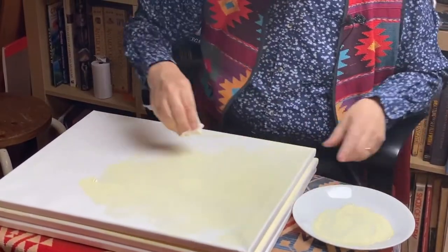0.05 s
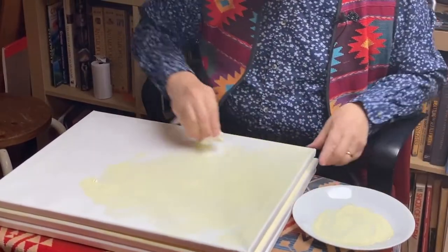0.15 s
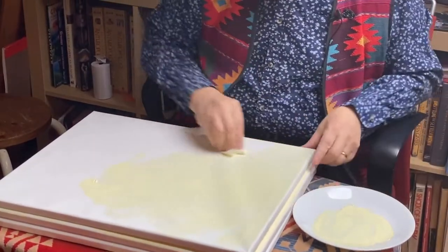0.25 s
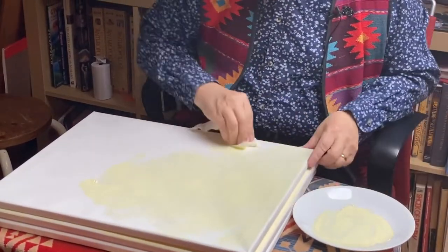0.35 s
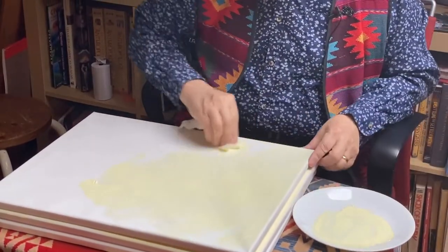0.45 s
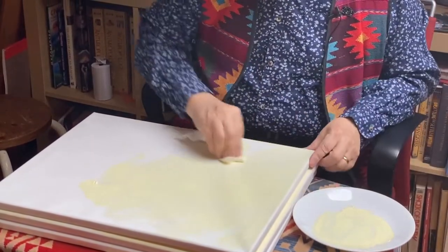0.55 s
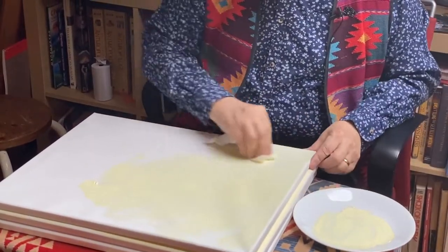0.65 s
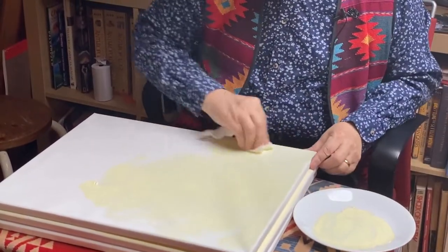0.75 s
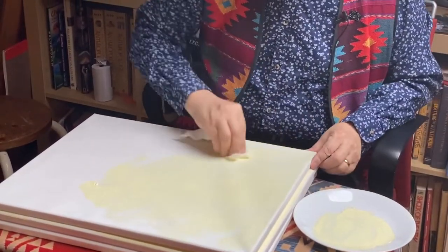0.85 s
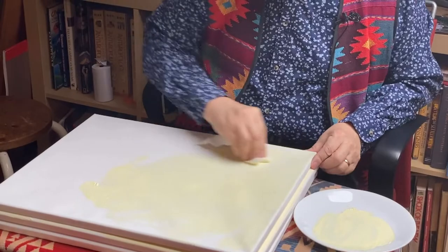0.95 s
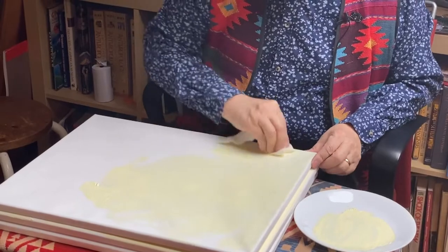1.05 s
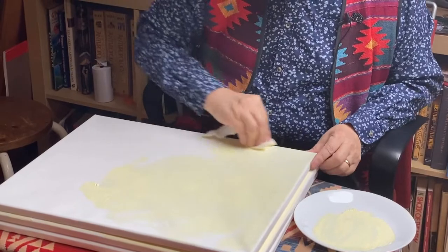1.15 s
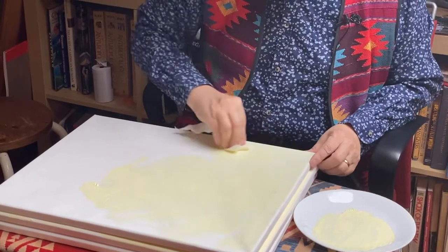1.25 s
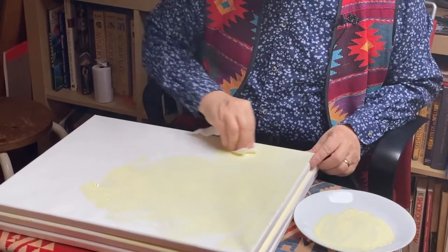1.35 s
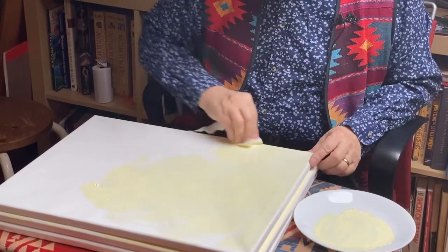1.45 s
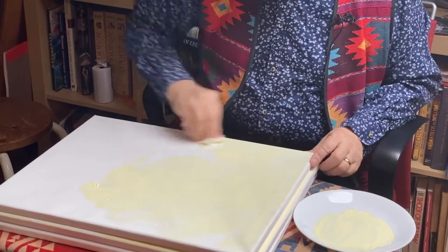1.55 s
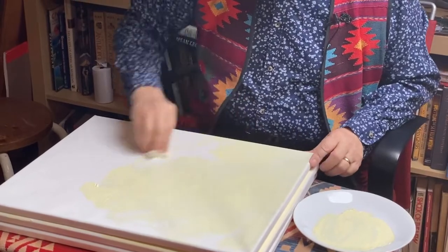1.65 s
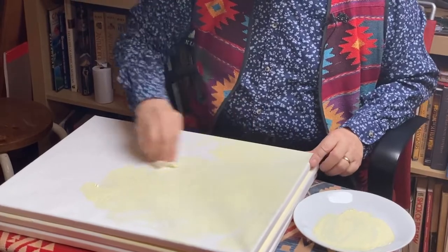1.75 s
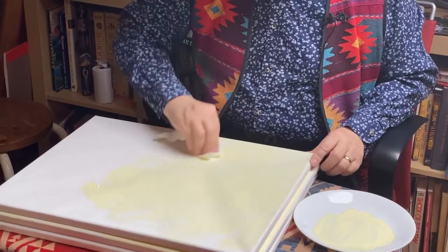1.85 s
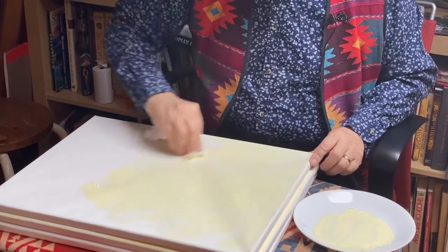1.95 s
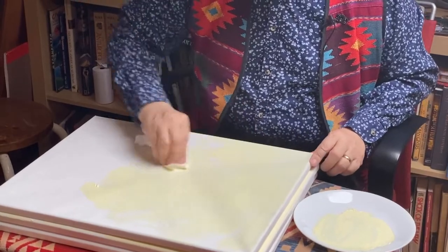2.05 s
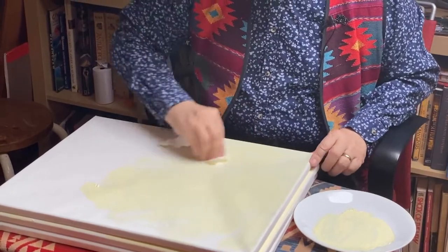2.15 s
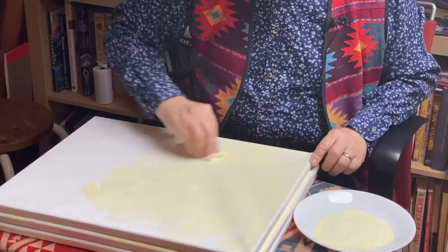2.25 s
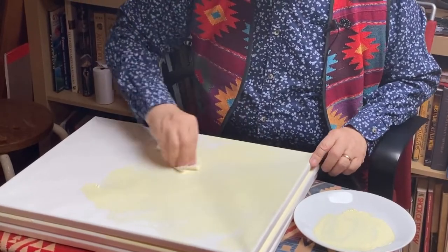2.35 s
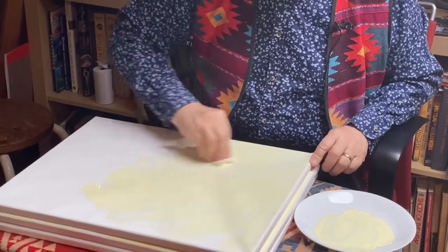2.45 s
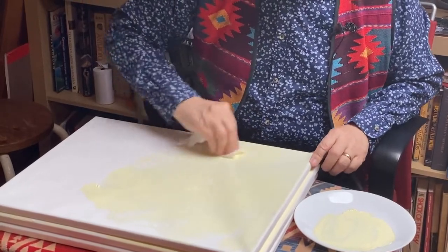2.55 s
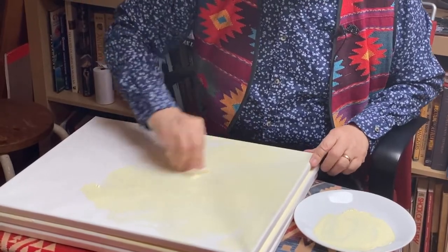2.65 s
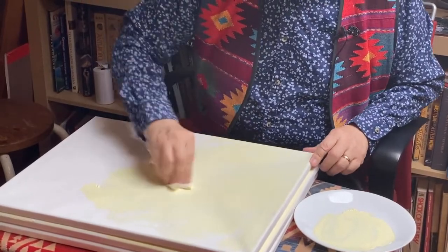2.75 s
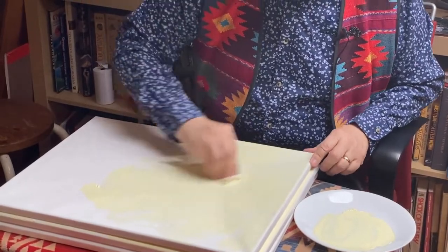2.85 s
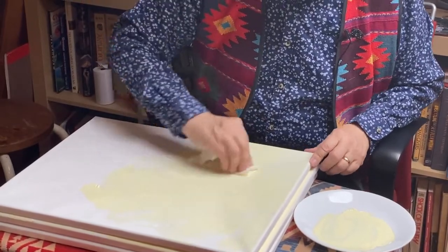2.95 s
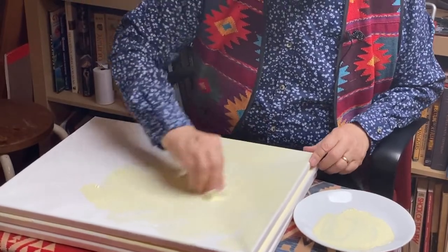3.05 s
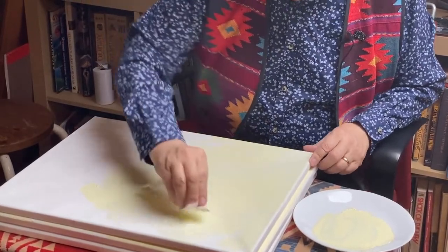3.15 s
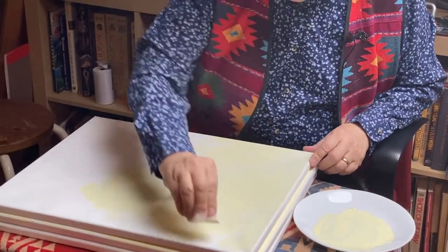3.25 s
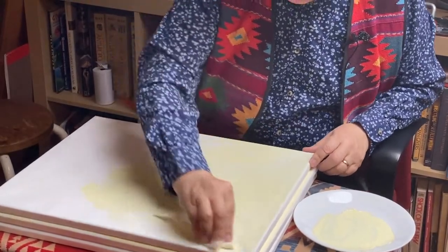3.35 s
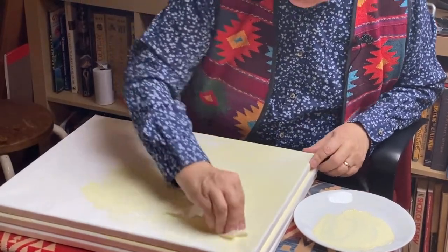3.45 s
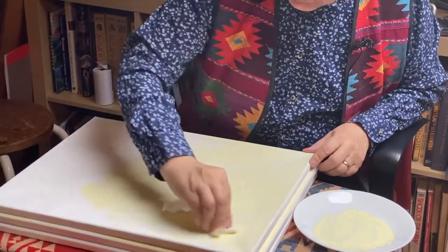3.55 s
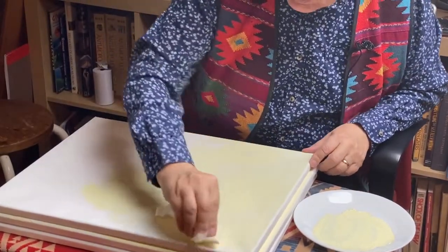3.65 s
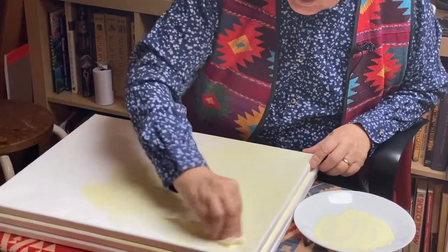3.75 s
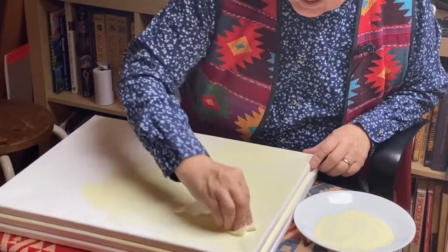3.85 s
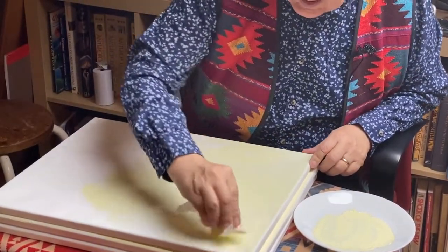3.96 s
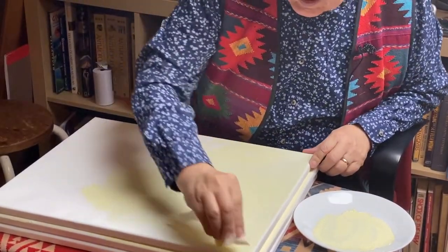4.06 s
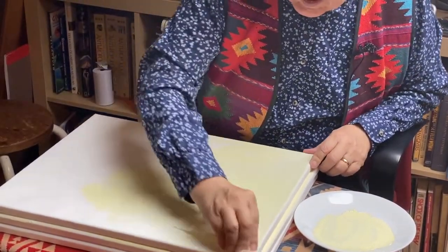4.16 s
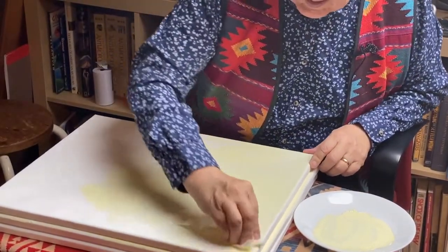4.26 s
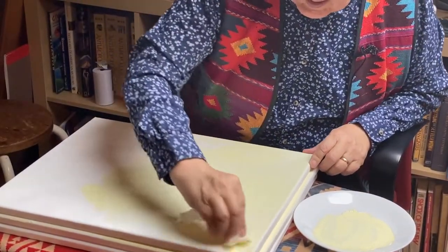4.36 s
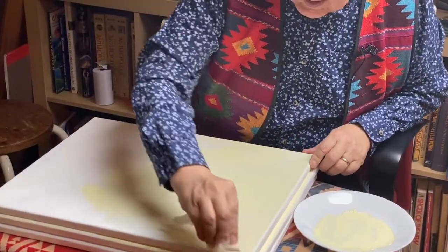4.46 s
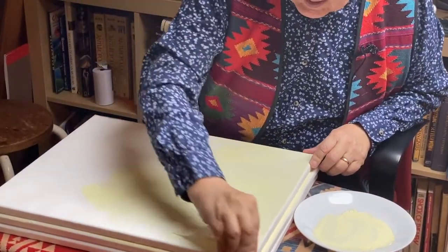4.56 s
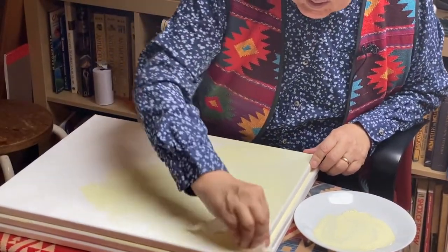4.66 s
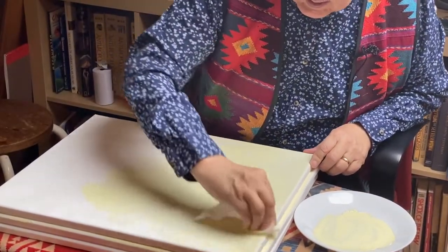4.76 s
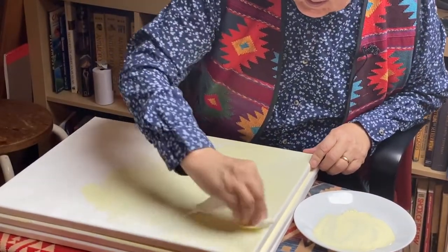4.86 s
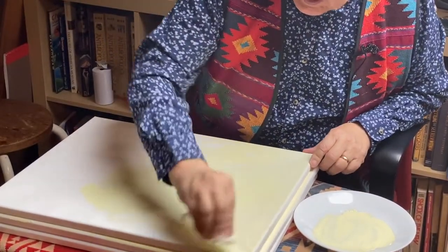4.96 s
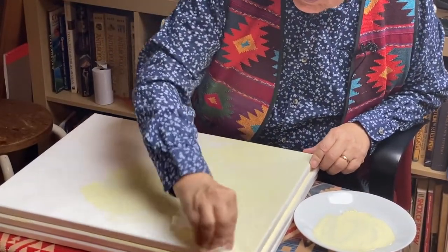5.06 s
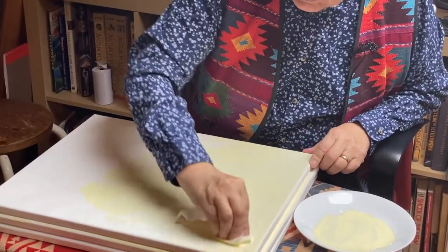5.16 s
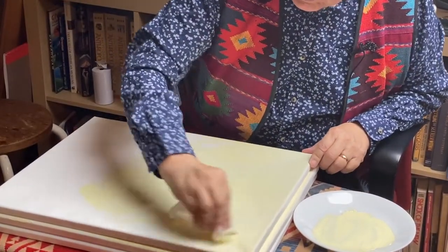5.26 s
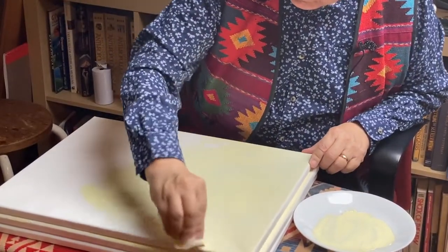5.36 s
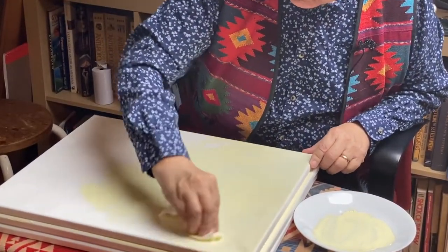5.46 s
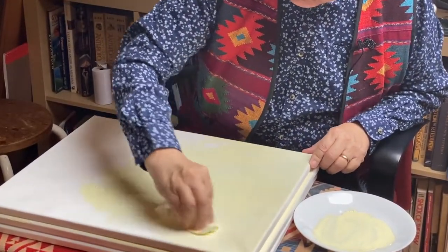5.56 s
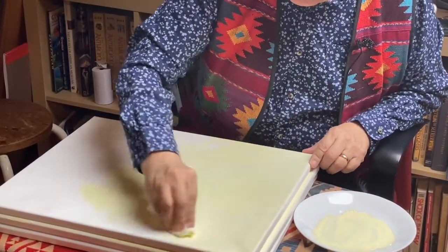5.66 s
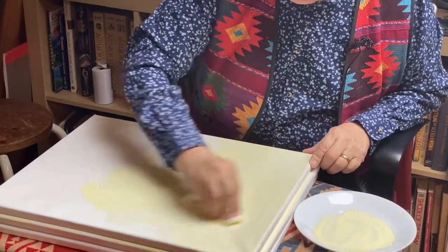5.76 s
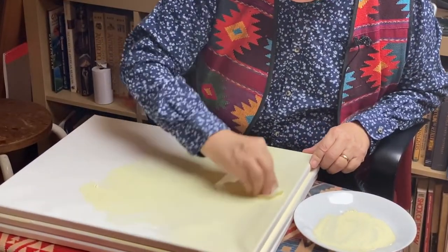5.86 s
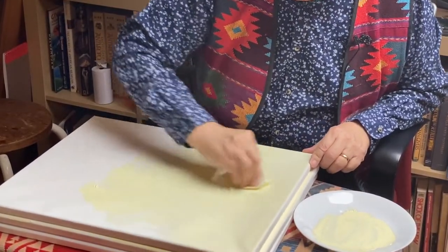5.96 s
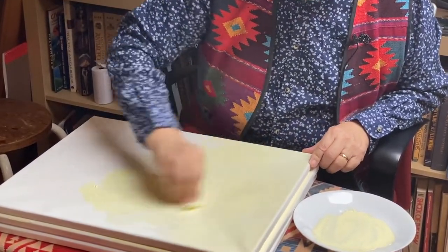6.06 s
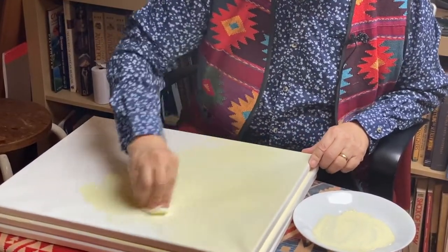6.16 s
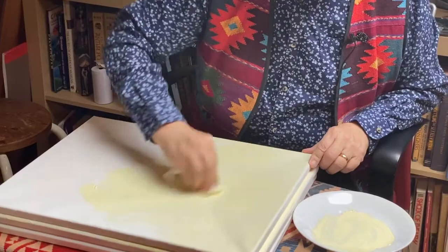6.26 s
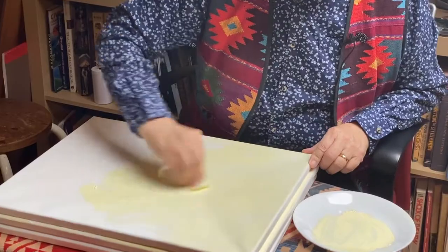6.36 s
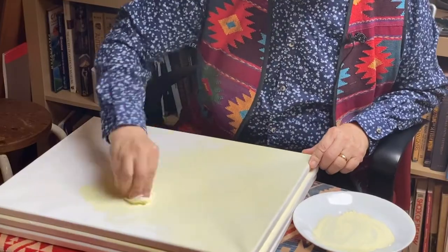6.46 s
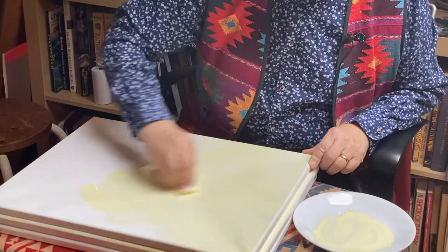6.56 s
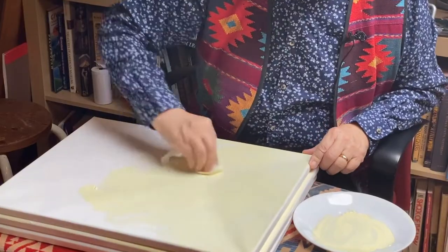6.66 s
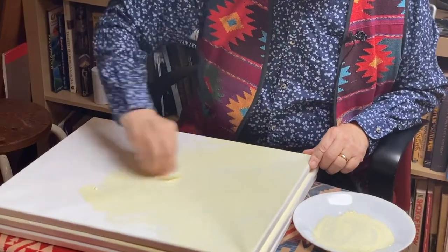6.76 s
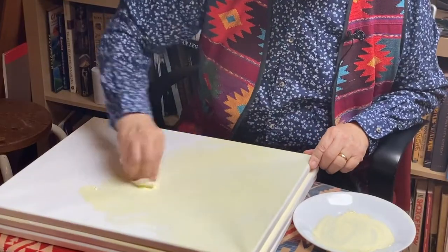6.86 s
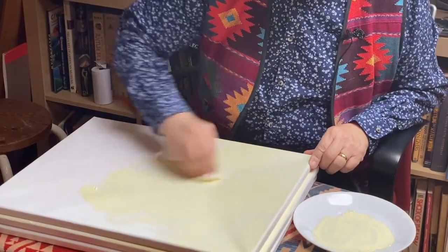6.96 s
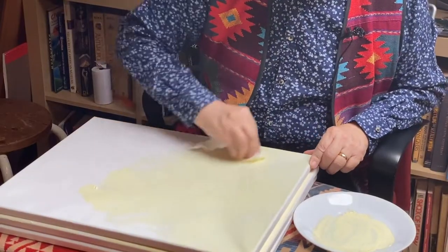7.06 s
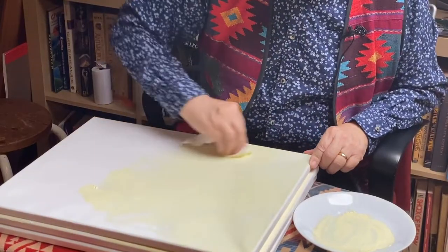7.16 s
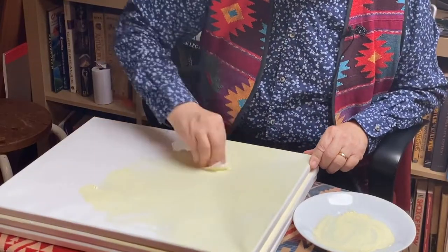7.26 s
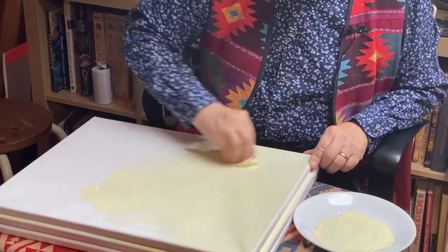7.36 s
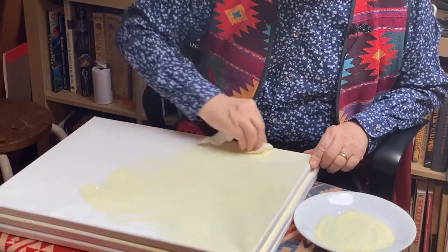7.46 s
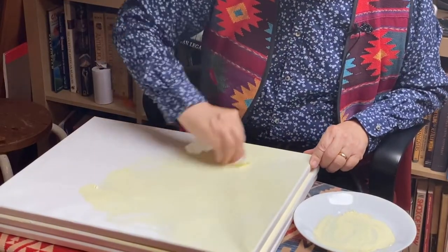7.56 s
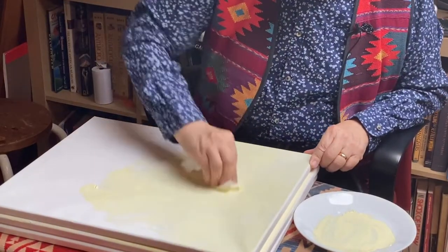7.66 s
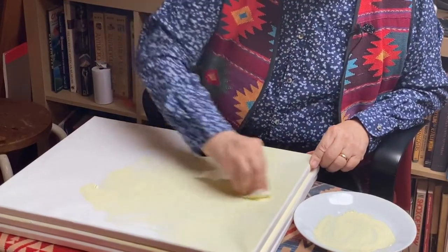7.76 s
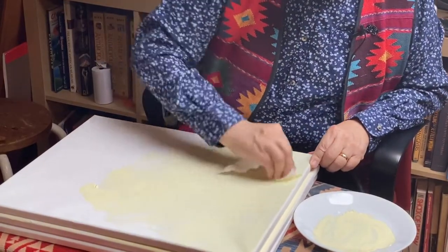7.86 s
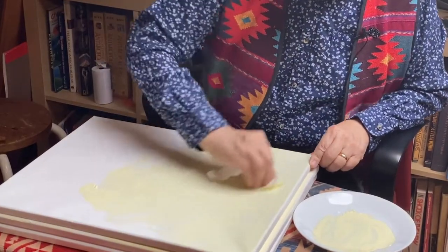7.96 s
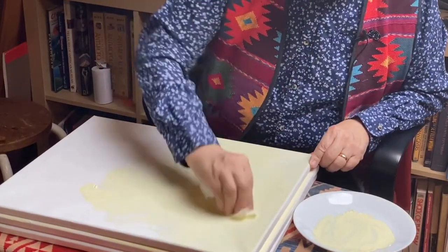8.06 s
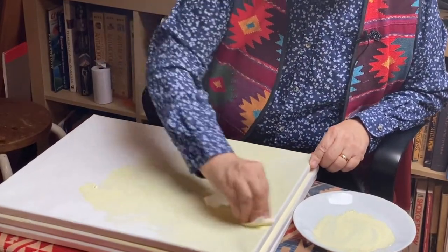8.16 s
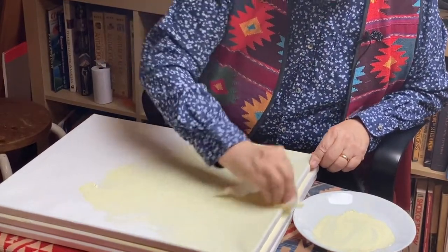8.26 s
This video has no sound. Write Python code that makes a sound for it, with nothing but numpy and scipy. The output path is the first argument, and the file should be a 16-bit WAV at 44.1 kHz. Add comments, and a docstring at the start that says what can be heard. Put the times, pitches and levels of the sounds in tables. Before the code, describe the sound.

Damp paper towel rubbed briskly back and forth on taut canvas, papery hissing swishes, with low hollow frame thuds and snaps from three seconds.

```python
"""A damp wad of paper towel is rubbed back and forth over a stretched canvas that lies on a stack of others.
Random fibre slips, coloured by filters and driven by the hand's speed, make hiss, fizz, scrape and drumming.
Snaps, rough scuffs and two brief drones come from the cloth; its frame thuds, rocks back and taps as damped
modes and noise bursts. It is heard close up in a small, quiet studio with a trembling table and a faint whine."""
import sys
import numpy as np
from scipy import signal
from scipy.fft import rfft, irfft, next_fast_len
from scipy.io import wavfile
from scipy.ndimage import uniform_filter1d, map_coordinates

SR = 44100
rng = np.random.default_rng(int(sys.argv[2]) if len(sys.argv) > 2 else 0)


def waveform_to_disk(signal):
    """Save audio, clipped to [-1, 1], as 16-bit WAV at the path in sys.argv[1]."""
    frames = np.transpose(np.atleast_2d(signal))
    scaled = np.clip(frames, -1, 1) * 32767
    samples = np.round(scaled).astype(np.int16)
    wavfile.write(sys.argv[1], SR, samples)


N = 366956  # length in samples, about 8.3 s


def amp(db):
    """Decibels to gain."""
    return 10 ** (np.asarray(db) / 20)


def unit(x):
    """x at rms 1."""
    return x / np.sqrt(np.mean(x ** 2) + 1e-20)


def noise():
    """White noise as long as the scene."""
    return rng.standard_normal(N)


def along(points, hz):
    """Interpolate (Hz, value) points on a log frequency axis."""
    point_hz, value = np.transpose(points)
    return np.interp(np.log(hz + 1), np.log(point_hz + 1), value)


def curve(rows):
    """One value per sample from (seconds, value) rows."""
    s, value = np.transpose(rows)
    return np.interp(np.arange(N) / SR, s, value)


def wobble(rate):
    """A smooth random curve, rate knots a second."""
    knots = rng.standard_normal(int(N * rate / SR) + 4)
    return map_coordinates(knots, [np.arange(N) * rate / SR])


def filtered(x, response):
    """x times a response of frequency."""
    size = next_fast_len(len(x) + SR // 4)
    hz = np.fft.rfftfreq(size, 1 / SR)
    return irfft(rfft(x, size) * response(hz), size)[:len(x)]


def coloured(x, spectrum):
    """x shaped by a spectrum, at rms 1."""
    return unit(filtered(x, lambda hz: amp(along(spectrum, hz))))


def burst(spectrum, attack, t60):
    """Half a second of coloured noise, struck and dying, like densely packed resonances."""
    t = np.arange(SR // 2) / SR
    envelope = (1 - np.exp(-t / attack)) * amp(-60 * t / t60)
    return coloured(rng.standard_normal(len(t)), spectrum) * envelope


def ring(modes, attack, scatter_db):
    """Half a second of damped modes; the hand's load shifts their pitch and strength a little each time."""
    t = np.arange(SR // 2) / SR
    tones = np.zeros(len(t))
    for hz, db, t60 in modes:
        gain_db = scatter_db * rng.uniform(-1, 1)
        detuned_hz = hz * (1 + .025 * rng.uniform(-1, 1))
        tones += amp(db + gain_db - 60 * t / t60) * np.sin(2 * np.pi * detuned_hz * t)
    return tones * (1 - np.exp(-t / attack))


def add(track, s, sound):
    """Mix a sound into the track at time s."""
    start = max(round(s * SR), 0)
    track[start:start + len(sound)] += sound[:len(track) - start]


def slips(rate, spread_db):
    """Tiny releases of fibres from the weave, rate a second, of uneven size."""
    happens = rng.random(N) < rate / SR
    size = rng.standard_normal(N) * amp(spread_db * rng.standard_normal(N))
    return happens * size / np.sqrt(rate)  # the rate alone does not change the loudness


def patchy(x, depth_db):
    """The colour shifts as the wad crumples and moves across the cloth."""
    z = signal.stft(x, nperseg=1024)[2]
    field = uniform_filter1d(rng.standard_normal(z.shape), size=7, axis=0)  # smooth over frequency
    field = uniform_filter1d(field, size=8, axis=1)  # smooth over time
    return unit(signal.istft(z * amp(depth_db * unit(field)), nperseg=1024)[1][:N])


# Colours of the wad on the cloth: fibre hiss, fine fizz, coarse scrape, swish on the wad's tips, drumming cloth.
# Each row: frequency in Hz, relative density in dB.
HISS_SPECTRUM = [(700, -25.5), (1600, -19), (2300, -1), (3000, 1), (3600, -5.5), (4200, -8), (4800, -17.5),
                 (6000, -22)]
FIZZ_SPECTRUM = [(3500, -36), (4700, -4.5), (5600, -4.5), (6300, -5), (6900, -14.5), (7500, -7.5)]
SCRAPE_SPECTRUM = [(500, -10), (1100, 1), (2300, 1), (3400, -16.5), (5000, -30.5)]
SWISH_SPECTRUM = [(2100, -24), (3000, -6.5), (3500, 5), (3950, -1.5), (4500, -10.5), (5500, -42)]
CLOTH_SPECTRUM = [(60, 2), (150, -12.5), (300, -2), (450, 1.5), (560, 1), (720, -1), (1000, -11),
                  (1400, -7), (2500, -26)]


def rubbing():
    """A stronger stroke frees more fibres a second; they hiss in the paper and drum on the cloth."""
    level_db, cloth_db, fizz_db, press_db = strokes()
    rate = 7000 * amp(.5 * (level_db - level_db.mean()))  # slips a second
    grains = slips(rate, spread_db=3)
    grip_db = level_db + 0.52 * wobble(36)  # the grip flutters
    hiss = amp(-3) * patchy(coloured(grains, HISS_SPECTRUM), depth_db=0.5)
    fizz = amp(fizz_db) * coloured(grains, FIZZ_SPECTRUM)
    # a flat wad scrapes coarsely, a lightly held one swishes on its tips
    scrape_grains = slips(rate, spread_db=0)
    scrape = amp(press_db - 1.5) * patchy(coloured(scrape_grains, SCRAPE_SPECTRUM), depth_db=2.5)
    swish = amp(-15 - 1.22 * press_db) * coloured(slips(rate, spread_db=3), SWISH_SPECTRUM)
    cloth_grains = slips(rate, spread_db=1.5)
    cloth = amp(cloth_db - 2.5) * patchy(coloured(cloth_grains, CLOTH_SPECTRUM), depth_db=2)
    zip_tone = amp(-10) * weave(level_db)
    return amp(grip_db) * (hiss + fizz + scrape + swish + cloth + zip_tone)


SPEED_POWER = 1.01  # friction amplitude grows as this power of the hand's speed
FIZZ_DB = -6.5  # fine fizz relative to the friction, at the average level and press
FIZZ_DB_PER_DB = -0.0962  # weaker friction fizzes slightly more, relative to its hiss
FIZZ_DB_PER_PRESS_DB = 0.43  # more paper on the cloth, more fizz
RESTING_CLOTH_DB, RESTING_PRESS_DB = 1, -1  # drumming and coarse scrape between sweeps
# In sweeps above this level (dB) the hand bears down at top speed: how much, and how briefly (power of the speed).
SURGE_FROM_DB, SURGE_DB_PER_DB, SURGE_NARROW = -53, 0.31, 9

# The wad creeping on the cloth between sweeps. Each row: time in seconds, friction level in dB.
CREEP_LEVELS = [(0, -67), (.4, -63.5), (.84, -67.5), (1.05, -64.5), (1.4, -65.5), (2.3, -64), (3.2, -66),
                (3.6, -71), (4.9, -79), (5.7, -63), (6.4, -68), (7.1, -62.5), (8.3, -64)]
# The sweeps of the hand. Each row: start in seconds, length in seconds, friction level in dB before any surge,
# share of the length spent speeding up (0-1), drumming of the cloth relative to the friction in dB before the
# common trim, coarse scrape from how flat the wad is pressed in dB before the common trim.
SWEEPS = [(0.135, .207, -58.5, 0.47, 4, 0), (0.485, .193, -55.5, 0.66, 0, -2),
          (.642, .163, -56.5, 0.32, -9, -4.5), (0.877, .165, -56.5, 0.31, 1.5, -2.5),
          (1.091, .16, -62, 0.14, -22, -6.5), (1.227, .218, -61, .62, 0, -7.5),
          (1.478, .222, -46.5, .34, -8, -4), (1.653, .205, -46.5, 0.67, -6, -4.5),
          (1.84, .184, -51, 0.5, 1, -2.5), (1.992, .173, -51.5, 0.62, -2.5, -3),
          (2.178, .138, -53, 0.44, -13.5, -2.5), (2.327, 0.14, -52, 0.54, 3, -6),
          (2.514, .19, -53, .51, -3.5, -3), (2.74, .159, -49, 0.6, -5, -6), (2.903, .191, -54, 0.2, -1, -3),
          (3.288, .3, -55.5, 0.12, 5.5, -6), (3.641, .189, -53.5, 0.43, 3, -7),
          (3.825, .09, -57.5, 0.7, 7.5, -4), (4.047, .32, -60.5, 0.28, 5.5, -6.5),
          (4.277, .064, -62.5, 0.34, 4, -3.5), (4.501, .142, -62, 0.35, 3, -8),
          (4.581, .235, -61, 0.27, 7, -8.5), (4.968, .219, -53.5, 0.38, 4, -7.5),
          (5.166, .085, -55, 0.5, 3, -5), (5.335, .192, -54, 0.32, 3.5, -8.5),
          (5.489, .116, -59.5, 0.62, 4, -0.5), (5.617, .325, -48, .37, -5, -7.5),
          (5.859, .239, -50, 0.9, -1.5, -3.5), (6.101, .224, -53, .34, -3, -6),
          (6.26, .171, -53, 0.69, -4, -2), (6.434, .229, -52, 0.49, -5.5, -4),
          (6.614, .191, -52, 0.52, -2.5, -4), (6.808, .25, -47, 0.53, -9.5, -2),
          (7.088, .15, -59.5, .4, 3, -1.5), (7.248, .167, -53.5, 0.46, -2.5, -1.5),
          (7.463, 0.0926, -58.5, 0.45, 7, -2), (7.506, .205, -56.5, 0.25, -12, -4.5),
          (7.676, .186, -50, 0.6, -5.5, -7.5), (7.839, .285, -54.5, 0.24, 0.5, -7),
          (8.05, .301, -58, 0.39, 0, -13)]


def strokes():
    """Friction, drumming, fizz and press in dB: sweeps follow the hand's speed, over the creeping of the wad."""
    friction = amp(curve(CREEP_LEVELS)) ** 2  # in power
    drumming = friction * amp(RESTING_CLOTH_DB) ** 2
    pressing = friction * RESTING_PRESS_DB  # a power-weighted sum of dB
    for s, length, db, rise, cloth_db, press_db in SWEEPS:
        speed = arch(length, rise)
        drive = speed ** SPEED_POWER
        surge_db = SURGE_DB_PER_DB * max(db - SURGE_FROM_DB, 0) * (speed ** SURGE_NARROW - .5)
        power = (amp(db + surge_db) * drive) ** 2
        add(friction, s, power)
        add(pressing, s, power * press_db)
        add(drumming, s, (amp(db + cloth_db) * drive) ** 2)  # the drumming has no surge
    level_db = 10 * np.log10(friction)
    cloth_db = 10 * np.log10(drumming / friction)
    press_db = pressing / friction
    fizz_db = FIZZ_DB + FIZZ_DB_PER_DB * (level_db - level_db.mean())
    fizz_db = fizz_db + FIZZ_DB_PER_PRESS_DB * (press_db - press_db.mean())
    return level_db, cloth_db, fizz_db, press_db


def arch(length, rise):
    """The hand's speed over one sweep: from rest up to 1 and back, with the top after the share rise."""
    u = np.linspace(0, 1, round(length * SR))
    top = np.clip(rise, .05, .95)
    return np.abs(np.sin(np.interp(u, [0, top, 1], [0, np.pi / 2, np.pi])))


def weave(level_db):
    """Threads pass under the wad faster as the friction grows: a rough zip that rises and falls in pitch."""
    smooth_db = uniform_filter1d(level_db, size=SR // 20)
    thread_hz = 1250 * amp(.3 * (smooth_db + 47))  # 1250 Hz at a friction of -47 dB
    phase = 2 * np.pi * np.cumsum(thread_hz) / SR
    fundamental = wobble(220) * np.sin(phase) + wobble(220) * np.cos(phase)
    return unit(fundamental + 1.1 * wobble(400) * np.sin(2 * phase))


# Modes of the taut cloth under a snap. Each row: frequency in Hz, relative level in dB, t60 in seconds.
CRACK_MODES = [(700, -4.5, 0.006), (1380, -2.5, 0.0091), (2120, 15.5, 0.0036), (2920, -14, 0.0023)]
# Colour of the snapping paper. Each row: frequency in Hz, relative density in dB.
SNAP_SPECTRUM = [(200, -11.5), (600, 15.5), (1300, 0), (2000, 6.5), (3200, 5), (4500, -10), (6200, -9),
                 (7500, -20)]
# The wad snaps free of the weave. Each row: time in seconds, level in dB before the trim of each part.
SNAP_TIMES = [(1.545, -38.5), (3.3042, -37), (3.3192, -37), (3.674, -36), (3.841, -52), (4.063, -44),
              (4.0886, -32.5), (4.143, -49), (4.5053, -36.5), (4.9605, -40), (4.9795, -30.5), (5.3477, -34)]


def snaps():
    """The paper sharply lets go: the taut cloth rings briefly under a burst of noise."""
    out = np.zeros(N)
    for s, db in SNAP_TIMES:
        add(out, s, amp(db - 11.5) * ring(CRACK_MODES, attack=.0001, scatter_db=0.5))
        add(out, s, amp(db - 2) * burst(SNAP_SPECTRUM, attack=0.0004, t60=0.024))
    return out


def squeak():
    """One fibre catches: a tiny, high burst of noise."""
    out = np.zeros(N)
    spectrum = [(4500, -40), (5900, -2), (7200, -6)]  # (Hz, dB)
    add(out, .843, amp(-42.5) * burst(spectrum, attack=.001, t60=.025))
    return out


DRONE_HZ, DRONE_WAVER = 445, .3  # pitch; scale of the tone's phase drift in radians
DRONE_ROUGH_DB = -7  # the scraping noise relative to the tone
# Colour of the noise around the drone. Each row: frequency in Hz, relative density in dB.
DRONE_SPECTRUM = [(300, -55), (410, -4.5), (445, -27.5), (480, -28), (580, -8), (670, -17), (850, -64)]
# The cloth drones. Each row: start in seconds, length in seconds, level of the tone in dB,
# share of the length spent swelling (0-1, held within 0.05-0.95).
DRONES = [(3.001, 0.079, -56.5, .22), (4.972, 0.34, -52, 0)]


def drone():
    """The wad sticks and slips in time with a resonance of the cloth: a wavering sine in scraping noise."""
    swell = np.zeros(N)
    for s, length, db, rise in DRONES:
        add(swell, s, amp(db) * arch(length, rise))
    phase = 2 * np.pi * DRONE_HZ * np.arange(N) / SR + DRONE_WAVER * wobble(23)
    tone = unit(np.sin(phase))
    return swell * (tone + amp(DRONE_ROUGH_DB) * coloured(noise(), DRONE_SPECTRUM))


SCUFF_OCTAVES, SCUFF_RISE = 0.7, 0.61  # half width of a note at -30 dB; share of its length spent swelling
# The wad drags for a moment. Each row: start in seconds, length in seconds, level in dB, pitch in Hz.
SCUFF_NOTES = [(.15, 0.088, -56, 415), (.585, 0.058, -57, 680), (.765, 0.042, -60.5, 696),
               (1.24, .04, -63, 900), (1.52, 0.036, -57, 1230), (1.785, .055, -51, 430),
               (3.33, .06, -49.5, 492), (4.66, 0.067, -62.5, 778), (5.63, .17, -55, 756),
               (5.982, .075, -54.5, 1228), (6.99, 0.048, -55, 635), (7.48, .04, -54.5, 1200)]


def scuffs():
    """Brief rough notes where the damp paper drags on the cloth, made of narrow-band noise."""
    out = np.zeros(N)
    width = 2 ** SCUFF_OCTAVES
    for s, length, db, hz in SCUFF_NOTES:
        swell = arch(length, SCUFF_RISE)
        below = [(hz / width ** 2, -80), (hz / width, -30)]
        above = [(hz * width, -30), (hz * width ** 2, -80)]
        note = coloured(rng.standard_normal(SR // 2), below + [(hz, 0)] + above)
        add(out, s, amp(db) * swell * unit(note[:len(swell)]))
    return out


# Drum modes of the whole canvas. Each row: frequency in Hz before the pitch ratio, relative level in dB,
# t60 in seconds.
SKIN_MODES = [(45.6, -15.5, 0.45), (66, 2.5, 0.093), (133, -9.5, .07)]
# Colour of the wooden knock. Each row: frequency in Hz, relative density in dB.
KNOCK_SPECTRUM = [(40, -15), (110, 7.5), (170, 3), (230, 5), (350, -3), (550, -7.5), (800, -39),
                  (1500, -34.5), (5000, -59.5)]
# The frame is pressed down on the stack. Each row: time in seconds, boom and wooden knock in dB before
# their common trims, pitch ratio from the cloth's tension.
THUD_TIMES = [(0.181, -32, -50, 0.96), (2.784, -31.5, -52, 1.25), (3.319, -21.5, -31.5, 1.03),
              (3.674, -23.5, -35.5, 0.85), (4.088, -21.5, -29.5, 0.87), (4.504, -27, -35, 1.1),
              (4.980, -17.5, -25, 0.97), (5.347, -27, -36, 1.07), (5.927, -32.5, -46, 0.78),
              (7.857, -34, -52, 0.83)]


def thuds():
    """The canvas booms like a slack drum as its frame lands, with a noisy knock of the wood."""
    out = np.zeros(N)
    for s, boom_db, knock_db, ratio in THUD_TIMES:
        skin = [(hz * ratio, db, t60) for hz, db, t60 in SKIN_MODES]
        add(out, s, amp(boom_db + 4) * ring(skin, attack=0.0066, scatter_db=0))
        add(out, s, amp(knock_db - 5) * burst(KNOCK_SPECTRUM, attack=0.0018, t60=0.21))
    return out


# Modes of the rocking frame. Each row: frequency in Hz, relative level in dB, t60 in seconds.
FRAME_MODES = [(28.8, -9, 0.45), (61, -1, 0.13), (165.7, -7.5, 0.12), (268.7, -2.5, 0.073),
               (468, -13.5, 0.047), (536, -14.5, 0.054), (603, -23, 0.11)]
# Colour of the scuffing edge. Each row: frequency in Hz, relative density in dB.
JUDDER_SPECTRUM = [(60, -20.5), (250, 2.5), (520, 6.5), (800, -22), (1400, -12), (3500, -23.5),
                   (7000, -36.5)]
# The frame rocks back. Each row: landing time in seconds, level of the ringing modes in dB.
ROCK_TIMES = [(3.524, -27), (3.872, -27), (4.314, -25), (4.793, -27), (5.202, -27), (5.546, -30.5),
              (7.860, -41)]


def rocks():
    """The frame rocks back with a short judder and its wood rings."""
    out = np.zeros(N)
    for s, db in ROCK_TIMES:
        judder = burst(JUDDER_SPECTRUM, attack=0.0043, t60=0.097)
        add(out, s - .015, amp(db - 13) * judder)  # the edge scuffs before it lands
        add(out, s, -amp(db) * ring(FRAME_MODES, attack=.0015, scatter_db=2))  # the cloth swings the other way
    return out


# Modes of the frame under a light tap. Each row: frequency in Hz, relative level in dB, t60 in seconds.
TAP_MODES = [(121, -10, 0.044), (225, -2, 0.028), (344, -2.5, 0.024), (453, -2.5, 0.02), (680, -2.5, 0.02)]
# The frame taps its neighbours. Each row: time in seconds, level in dB before the common trim,
# contact time in seconds.
TAP_TIMES = [(0.519, -34, 0.00039), (1.897, -37, 0.00087), (2.48, -43, 0.0022), (3.111, -30, 0.003),
             (3.703, -22.5, 0.00071), (4.121, -21, 0.0024), (4.537, -38, 0.0023), (5.978, -33.5, 0.0029),
             (7.152, -33, 0.00075), (7.702, -28.5, 0.0019)]


def taps():
    """Light taps of the frame on its neighbours; a longer contact sounds duller."""
    out = np.zeros(N)
    for s, db, contact in TAP_TIMES:
        tap = ring(TAP_MODES, attack=0.00034, scatter_db=2)
        add(out, s, amp(db - 5) * softened(tap, contact))
    return out


def softened(sound, contact):
    """A blow spread over a longer contact loses its treble."""
    t = np.arange(SR // 200) / SR
    push = np.sin(np.pi * np.minimum(t / contact, 1)) ** 2
    return signal.fftconvolve(sound, push / push.sum())


# Colour of the trembling. Each row: frequency in Hz, relative density in dB.
SWAY_SPECTRUM = [(10, 7), (25, 1.5), (40, -5), (65, -9.5), (100, -23), (200, -39), (500, -67)]
# The table trembling under the arm. Each row: time in seconds, level in dB before the common lift and flutter.
TREMBLE_LEVELS = [(0, -51.5), (.7, -55.5), (1.3, -54.5), (1.7, -46.5), (2.4, -52), (3.3, -49), (5.2, -47),
                  (5.8, -50.5), (6.5, -54.5), (7.8, -53), (8.3, -47.5)]


def trembling_table():
    """The table trembles under the arm: an unsteady low rumble."""
    level_db = curve(TREMBLE_LEVELS) + 5.5 + 3.2 * wobble(9.2)
    return amp(level_db) * coloured(noise(), SWAY_SPECTRUM)


# Colour of the room's air. Each row: frequency in Hz, relative density in dB.
AIR_SPECTRUM = [(30, -3.5), (150, -3), (450, -11), (1200, -17.5), (2900, -27.5), (5800, -28), (7500, -38)]


def air():
    """The quiet air of the room, as steady coloured noise."""
    return amp(-62) * coloured(noise(), AIR_SPECTRUM)


# Strength of the faint whine. Each row: time in seconds, peak level in dB.
WHINE_LEVELS = [(0, -75), (2.6, -75.5), (3.2, -69.5), (5.4, -71), (6.2, -71)]


def whine():
    """A thin whine at 1125 Hz whose phase drifts slightly."""
    phase = 2 * np.pi * 1125 * np.arange(N) / SR + 0.075 * wobble(3.9)
    return amp(curve(WHINE_LEVELS)) * np.sin(phase)


# Decay of the studio. Each row: frequency in Hz, t60 in seconds.
ROOM_DECAY = [(100, 0.31), (1000, 0.24), (7000, 0.17)]


def room(x):
    """A short tail from shelves and walls, treble dying first."""
    hz, t, z = signal.stft(rng.standard_normal(SR // 2), SR, nperseg=256)
    decay = amp(-60 * t / along(ROOM_DECAY, hz)[:, None])
    tail = signal.istft(z * decay, SR, nperseg=256)[1]
    delayed = np.pad(tail, (SR // 200, 0))  # starts 5 ms after the direct sound
    return signal.fftconvolve(x, delayed / np.linalg.norm(tail))[:N]


def scene():
    """The work on the canvas, heard from close by, over the background of the room."""
    work = rubbing() + snaps() + squeak() + drone() + scuffs() + thuds() + rocks() + taps()
    wet = amp(-16) * room(work)
    background = trembling_table() + air() + whine()
    return (work + wet + background)[None]


def record(dry):
    """The recorder rolls off steeply at its band limit."""
    edge = [(6900, 0), (7150, -5), (7400, -17), (7600, -36), (7800, -90)]  # (Hz, dB)
    return np.array([filtered(x, lambda hz: amp(along(edge, hz))) for x in dry])


dry = scene()
out = record(dry)
waveform_to_disk(out)
```